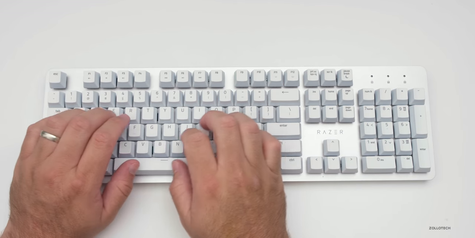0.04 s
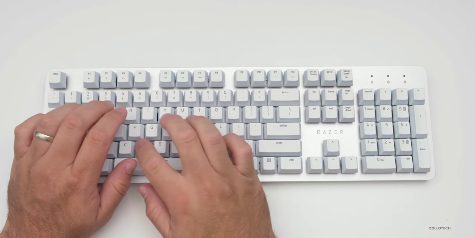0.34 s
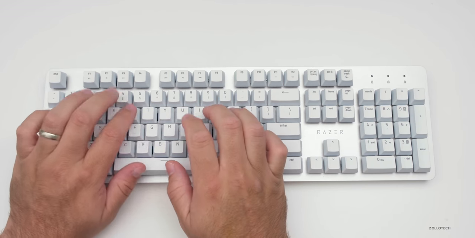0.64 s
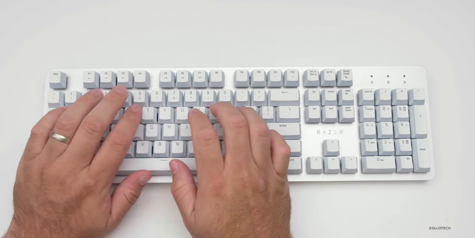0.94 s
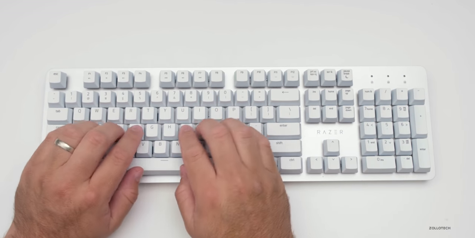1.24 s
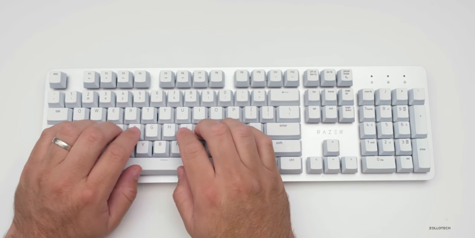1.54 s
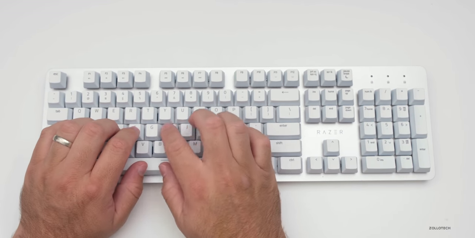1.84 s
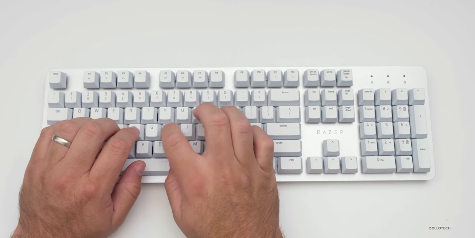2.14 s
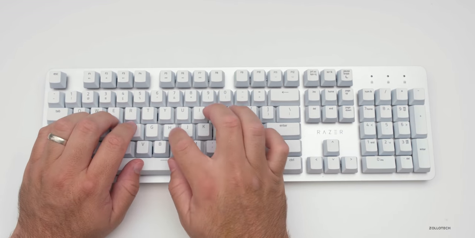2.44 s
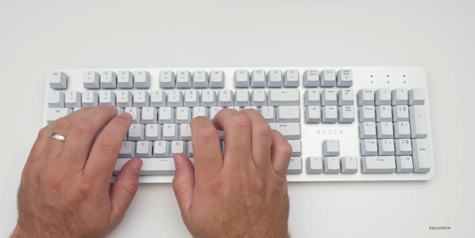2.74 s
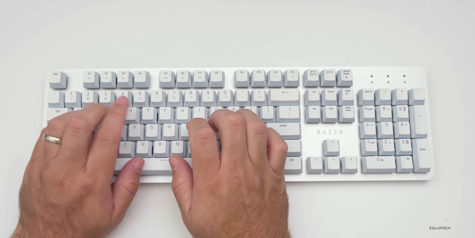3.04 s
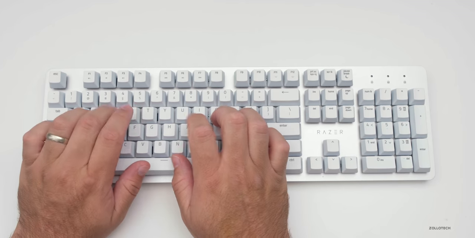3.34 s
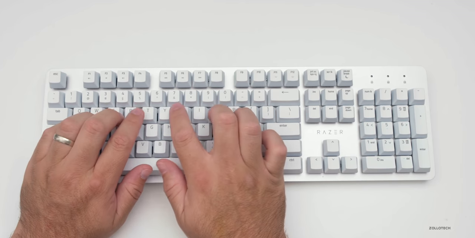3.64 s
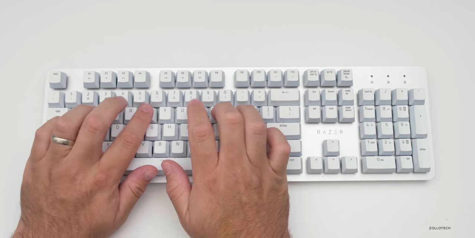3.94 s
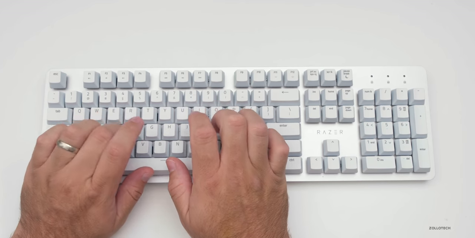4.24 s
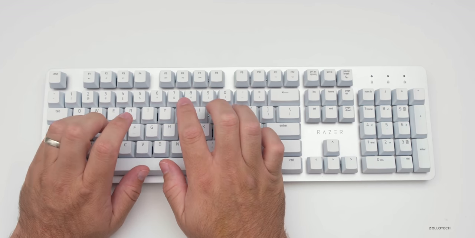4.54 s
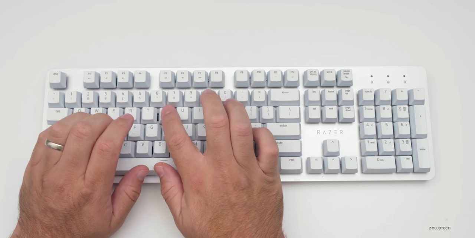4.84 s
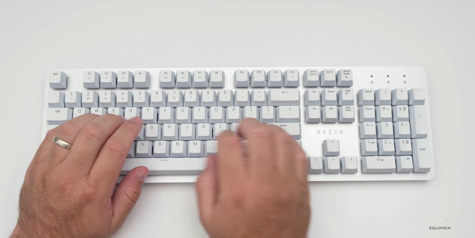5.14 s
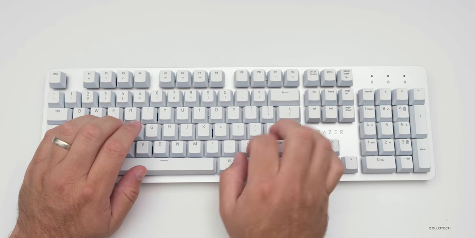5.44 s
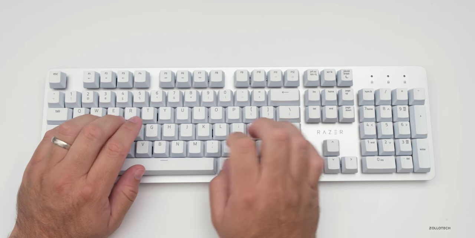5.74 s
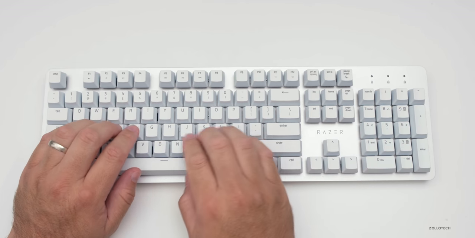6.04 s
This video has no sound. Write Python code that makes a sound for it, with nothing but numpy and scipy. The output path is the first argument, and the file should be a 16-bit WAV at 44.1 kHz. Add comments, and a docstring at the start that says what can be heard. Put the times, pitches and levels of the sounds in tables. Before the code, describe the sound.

In a small room with a low hum and faint hiss, a mechanical keyboard clatters close to the microphone. A few fast keystrokes come first, one of them especially sharp, then a short pause with soft finger touches on the keys. Typing resumes in rapid, irregular clusters of bright plastic clacks, with an occasional soft thud through the desk, and tails off into light taps.

```python
"""Short bursts of typing clatter close to the microphone: two hands on a mechanical keyboard on a desk.
Each key slides, strikes its stop and rattles; the blow rings keycap, plate, case and desk.
Between strokes, fingers brush the caps. A small room answers from the nearby walls,
and behind it all lie a low indoor hum and a faint hiss."""
import sys
import numpy as np
from scipy import signal
from scipy.fft import rfft, irfft
from scipy.io import wavfile

SR = 44100
rng = np.random.default_rng(int(sys.argv[2]) if len(sys.argv) > 2 else 0)


def dump(signal):
    """Clip the signal to [-1, 1] and save it as 16-bit WAV at the path in sys.argv[1]."""
    limited = np.clip(np.atleast_2d(signal).T, -1, 1)
    pcm = np.round(limited * 32767).astype(np.int16)
    wavfile.write(sys.argv[1], SR, pcm)


N = 268128

# room tone, rumble to hiss: f/Hz, relative density/dB
AIR_SPECTRUM = [(20, -1.5), (40, -6.5), (65, 3.5), (110, -3), (150, -11.5), (200, -19), (280, -21),
                (400, -27), (600, -29), (800, -35.5), (1400, -36), (2200, -39), (6000, -41), (16000, -43.5)]
# narrow tones of the indoor hum: f/Hz, width/Hz, level/dB
HUM_TONES = [(118.4, 5.8, -57), (253, 8.2, -77), (744, 14, -85.5), (1268, 8, -86)]
# echoes off nearby walls and furniture: t/s after the direct sound, level/dB relative to it
EARLY_ECHOES = [(.0046, -18), (.0117, -23), (.0134, -26), (.0218, -25.5)]
# colour of the room's tail: f/Hz, relative level/dB
TAIL_SPECTRUM = [(100, -4), (400, 11), (750, -5.5), (1200, -2.5), (2000, 2.5), (3200, -3), (5000, -0.5),
                 (9000, -5), (15000, -11.5)]
# modes of each part: f/Hz, width/Hz, relative level/dB
DESK_MODES = [(179.5, 22, 11), (235, 14, -9.5)]
CASE_MODES = [(348, 76, -3.5), (392, 94, -2), (457.7, 64, 0.5)]
PLATE_MODES = [(705.6, 96, 0), (874, 247, -7.5), (1074, 170, 0.5), (1282, 240, -6.5), (1545, 180, 0.5)]
CAP_MODES = [(1748, 360, 6), (2068, 280, 1.5), (2460, 504, 3.5), (2670, 475, -3.5), (3196, 270, 7.5),
             (3600, 580, 2.5), (4130, 410, 3), (4404, 760, -5)]
HOUSING_MODES = [(4380, 940, -2.5), (5037, 410, -7.5), (5810, 670, -7), (6320, 1000, -12)]
STEM_MODES = [(7345, 520, -6), (8330, 370, -4), (8920, 750, -8), (9590, 160, -10)]
CRACK_MODES = [(11400, 200, -3), (13000, 900, 3.5), (14740, 700, -10.5)]
# a desk thud under one key stroke, and a few soft knocks on the board: t/s, f/Hz, level/dB
LOW_THUDS = [(4.274, 171, -44.5), (4.485, 604, -66.5), (5.16, 221, -51.5), (5.808, 554, -64)]
# fingers shifting about on the caps: start t/s, end t/s, tick level/dB
FIDGET_SPANS = [(1.146, 1.339, -67.5), (1.476, 2.153, -70.5), (2.548, 3.149, -63.5), (3.35, 4.153, -64.5),
                (5.461, 5.591, -58), (5.948, 6.079, -69)]
# clear touches of a fingertip on a cap: t/s, level/dB
CAP_TOUCHES = [(.044, -57), (.153, -60.5), (.248, -53), (.624, -51.5), (.731, -55.5), (.839, -53),
               (.944, -61.5), (1.2, -64), (1.377, -61.5), (1.565, -65.5), (1.649, -62), (1.764, -65),
               (1.826, -55), (2.115, -57), (2.2989, -52.5), (2.684, -55.5), (2.699, -56), (2.947, -56),
               (3.307, -48), (3.723, -54.5), (3.748, -55), (3.878, -56), (3.9672, -53), (4.061, -52.5),
               (4.101, -57), (4.187, -60.5), (4.555, -58), (4.912, -54), (4.997, -55), (5.467, -60),
               (5.541, -56), (5.603, -57), (5.902, -63), (5.986, -55)]
# key strokes and returns: t/s, cap level/dB, cap f/Hz, then plate, case and switch rattle
# level/dB relative to the cap
KEYSTROKES = [(0.2577, -35, 3250, -9, -20.5, -11.5), (0.3272, -41, 3100, -4.5, -20, -2.5),
              (0.3837, -21, 3440, -14, -29.5, -6), (.446, -38.5, 3270, -3, -17, -1),
              (.4493, -38.5, 3270, -2, -13.5, -4.5), (0.5956, -47, 2660, -0.5, -20, -4.5),
              (0.6312, -34.5, 4020, -6, -23, -4), (0.7032, -38.5, 3230, -2.5, -21.5, 0),
              (0.8553, -46.5, 2350, 0.5, -10.5, -3), (1.8555, -62, 3703, 2, 4, 7),
              (1.8673, -34, 3340, -2, -26, -12.5), (2.0364, -39, 3000, -6.5, -18.5, -12.5),
              (2.1249, -44.5, 2600, -8, -20, -7.5), (2.1658, -39.5, 2180, -4, -5.5, -8),
              (2.317, -52, 1950, 1, 1.5, -1), (2.427, -34.5, 2830, -2.5, -21, -10.5),
              (2.5172, -43, 2940, 0.5, -19, -6), (2.6044, -38, 2630, -7.5, -32, -16),
              (2.7195, -41.5, 2520, -2.5, -35, -13), (2.7262, -43, 2830, -2.5, -18, -9),
              (2.805, -44.5, 2430, 6.5, -15, -2), (2.8849, -28, 2600, -8.5, -12, -13.5),
              (2.969, -37, 2810, 4.5, -1.5, 0.5), (2.987, -39, 3080, -1.5, -7, -8),
              (3.1271, -39, 3170, -4, -36, -4), (3.1433, -41.5, 3540, -6, -20, -20),
              (3.2707, -37, 3240, -8.5, -17, -1.5), (3.3161, -35.5, 3170, -7.5, -22, -10.5),
              (3.4095, -41.5, 3050, -5, -19, -3), (3.428, -33.5, 2660, -5.5, -8.5, -14),
              (3.4815, -37, 2910, 2.5, 0, -0.5), (3.49, -52, 3230, 3, 7.5, 3.5),
              (3.5774, -36, 2940, -5, -19, -19), (3.628, -51, 2900, 0, -33, -14),
              (3.6517, -43, 3130, -2, -11, -9.5), (3.7617, -38, 3410, -4.5, -21, -10),
              (3.8119, -32.5, 2500, -6.5, -8, -10.5), (3.8226, -38.5, 2340, -2, -23, -15),
              (3.8497, -44, 3400, 4, -8.5, -1.5), (3.9219, -53.5, 3100, -3, -6, 3.5),
              (3.9328, -41.5, 2130, -2.5, -11, -5.5), (4.0239, -32, 2530, -14, -36, -23),
              (4.034, -49, 2640, 6.5, -4, 0), (4.1301, -42, 2600, -5.5, -32, -10),
              (4.2568, -49.5, 3230, -7.5, -11, -9), (4.273, -38, 3380, -7.5, -27, -11),
              (4.3637, -39.5, 3500, -4, -18, -3.5), (4.5874, -34, 3150, -5, -16, -14),
              (4.7096, -43.5, 2880, -0.5, -20, -5), (4.846, -51, 3700, -9, -13, -7.5),
              (4.9201, -49, 2940, -2.5, -11.5, -22), (5.0142, -38.5, 3240, -7.5, -13.5, -11),
              (5.2553, -46.5, 2840, -10, -22, -4.5), (5.276, -33.5, 2120, -2, -15.5, -10),
              (5.306, -47, 3020, -4, -30, -11), (5.3515, -42.5, 2920, -2, -32, -13),
              (5.4851, -43, 3750, 5, -6.5, 0), (5.4965, -33.5, 3220, -5.5, -18, -5.5),
              (5.6124, -42.5, 3480, 3.5, -8, -6.5)]

RING_SIZE = 4096  # samples in one ring of a part
USUAL_DB, DESK_DB, LANDING_DB = -39.5, -59, -61.5  # ordinary stroke: cap, desk thud, finger landing
DESK_GROWTH, SLIDE_GROWTH, LANDING_GROWTH = .82, .69, .41  # dB gained per dB of cap level
PLATE_HZ, PLATE_SAG_HZ_PER_DB = 1064, 12  # the plate sounds lower when driven harder than the cap


def undb(db):
    """Decibels to gain."""
    return 10 ** (np.asarray(db) / 20)


def unit(x):
    """Scale to an energy of one."""
    return x / np.sqrt(np.sum(x ** 2) + 1e-30)


def add(out, s, x):
    """Mix x into out from time s."""
    i = max(int(round(s * SR)), 0)
    n = max(min(len(x), len(out) - i), 0)
    out[i:i + n] += x[:n]


def coloured(points, size):
    """Noise of rms one, shaped by points of f/Hz, level/dB."""
    hz, db = np.transpose(points)
    f = np.maximum(np.fft.rfftfreq(size, 1 / SR), 1)
    gain = undb(np.interp(np.log(f), np.log(hz), db))
    noise = irfft(rfft(rng.standard_normal(size)) * gain, size)
    return noise / noise.std()


def room_tone(air_db=-53):
    """The place itself: low indoor rumble, faint hiss and a wavering hum."""
    f = np.fft.rfftfreq(N, 1 / SR)
    out = undb(air_db) * coloured(AIR_SPECTRUM, N)
    for hz, width_hz, db in HUM_TONES:
        tone = irfft(rfft(rng.standard_normal(N)) / (1 + ((f - hz) / width_hz) ** 2), N)
        out += undb(db) * tone / tone.std()
    return out


def room(x, quick_t60=.11, quick_db=-20, long_t60=.29, long_db=-22.5, smear_s=.00079):
    """Direct sound reaches the microphone, then echoes and two tails; each spot has its own paths."""
    t = np.arange(4 * RING_SIZE) / SR
    build = np.clip((t - .004) / .0027, 0, 1)
    tails = ((quick_t60, quick_db), (long_t60, long_db))
    decay = sum(undb(db) * unit(build * undb(-60 * t / t60)) for t60, db in tails)
    response = undb(-1.5) * decay * coloured(TAIL_SPECTRUM, len(t))
    response[0] += 1  # direct sound
    smear = np.exp(-t[:RING_SIZE] / smear_s)  # uneven surfaces spread each echo
    for s, db in EARLY_ECHOES:
        add(response, s, undb(db) * unit(rng.standard_normal(RING_SIZE) * smear))
    return signal.fftconvolve(x, response)


def contact(snap, rattle_s, rattle_db, settle_s=.000488, settle_db=-3.5):
    """Force spectrum: a blow (weighted by snap), the stem settling, then the loose cap's chatter."""
    t = np.arange(RING_SIZE) / SR
    snap = np.clip(snap, .05, .97)
    blow = undb(settle_db) * unit(rng.standard_normal(RING_SIZE) * np.exp(-t / settle_s))
    blow[0] = 1
    chatter = rng.standard_normal(RING_SIZE) * (rng.random(RING_SIZE) < .2) * np.exp(-t / rattle_s)
    return rfft(np.sqrt(snap) * unit(blow) + np.sqrt(1 - snap) * undb(rattle_db) * unit(chatter))


def ring(force, modes, db, scatter_db=3, detune=.057, lag=np.pi):
    """A part's modes answer a force, a little differently each time; db is the level over 10 ms."""
    hz, width, mode_db = np.transpose(modes)
    chance = rng.standard_normal((len(hz), 2))
    hz = hz * (1 + detune * chance[:, 0])
    # neighbouring modes swing lag radians apart; the less lag, the more abrupt the attack
    gain = undb(mode_db + scatter_db * chance[:, 1]) * np.exp(1j * lag * np.arange(len(hz)))
    jf = 1j * np.fft.rfftfreq(RING_SIZE, 1 / SR)
    response = sum((g.real * jf + g.imag * h) * w / (h ** 2 + jf ** 2 + jf * w)
                   for h, w, g in zip(hz, width, gain))
    # a part radiates little far below or above its own modes
    low, high = jf / (.75 * hz.min()), jf / (1.15 * hz.max())
    response *= low ** 2 / (low ** 2 + np.sqrt(2) * low + 1)
    response /= (high ** 2 + 1.2 * high + 1) ** 2
    return unit(irfft(force * response)) * undb(db) * np.sqrt(SR / 100)


def favour(modes, pitch_hz, focus_db, octaves):
    """Where a key sits decides which modes it wakes most: those near its own pitch."""
    return [(hz, width, db + focus_db * np.exp(-(np.log2(hz / pitch_hz) / octaves) ** 2))
            for hz, width, db in modes]


def rubbing(start_s=1.6, end_s=1.87, slips_per_s=300, slip_db=-81.5):
    """Barely audible even this close, skin slips over a cap in many tiny steps."""
    out = np.zeros(N)
    for s in rng.uniform(start_s, end_s, int((end_s - start_s) * slips_per_s)):
        force = contact(.12, rattle_s=.0057, rattle_db=-2)
        add(out, s, ring(force, CAP_MODES, slip_db))
    return room(out)[:N]


def touch(db, cap_hz=3100, plate_hz=1230):
    """A light touch makes a cap chatter against its stem."""
    force = contact(.19, rattle_s=.0043, rattle_db=-2.5)
    cap = ring(force, favour(CAP_MODES, cap_hz, focus_db=1.5, octaves=.35), db + .5, scatter_db=1.5)
    plate = ring(force, favour(PLATE_MODES, plate_hz, focus_db=9, octaves=.24), db, scatter_db=2)
    return cap + plate + ring(force, HOUSING_MODES, db - 12) + ring(force, STEM_MODES, db - 17)


def fingers(fidgets_per_s=40, spread_db=2):
    """Fingertips land ahead of the strokes, touch idle caps and fidget; desk and board thud softly."""
    out = np.zeros(N)
    landings = [(s - rng.uniform(.007, .02), LANDING_DB + LANDING_GROWTH * (db - USUAL_DB))
                for s, db, *_ in KEYSTROKES]
    fidgets = [(s, db + spread_db * rng.standard_normal())
               for start, end, db in FIDGET_SPANS
               for s in rng.uniform(start, end, int((end - start) * fidgets_per_s))]
    for s, db in list(CAP_TOUCHES) + landings + fidgets:
        add(out, s, touch(db))
    for s, hz, db in LOW_THUDS:
        force = contact(.25, rattle_s=.0074, rattle_db=2.5)
        add(out, s, ring(force, [(hz, 35, 0)], db))
    return room(out)[:N]


def slide(db, lead_s, swell_s=.0057):
    """The stem scrapes down its housing, louder and louder until it strikes at lead_s."""
    ahead_s = (int(lead_s * SR) - np.arange(RING_SIZE)) / SR
    slips = rng.standard_normal(RING_SIZE) * (rng.random(RING_SIZE) < .3)
    force = rfft(slips * (ahead_s > 0) * np.exp(-(ahead_s / swell_s) ** 2 / 2))
    scrape = ring(force, CAP_MODES[2:] + HOUSING_MODES, db)
    return scrape + ring(force, STEM_MODES, db - 14) + ring(force, PLATE_MODES, db - 2.5)


def typing(lead_s=.04, case_lag_s=.00051, desk_lag_s=.00033):
    """Close to the microphone, each blow rings every part; the heavy case and desk answer later."""
    out = np.zeros(N)
    for s, db, cap_hz, plate_db, case_db, rattle_db in KEYSTROKES:
        harder_db = db - USUAL_DB
        stem_db = rattle_db - 5.5
        snap = .41 + .014 * harder_db - .01 * rattle_db  # cleaner with more force and less rattle
        force = contact(snap, rattle_s=.004, rattle_db=-2)
        cap_modes = favour(CAP_MODES, cap_hz, focus_db=9, octaves=.34)
        plate_hz = PLATE_HZ - PLATE_SAG_HZ_PER_DB * plate_db
        plate_modes = favour(PLATE_MODES, plate_hz, focus_db=5, octaves=.25)

        key = slide(USUAL_DB - 19.5 + SLIDE_GROWTH * harder_db, lead_s)
        cap = ring(force, cap_modes, db + .11, scatter_db=4.04, detune=.031, lag=1.136)
        plate = ring(force, plate_modes, db + plate_db + .47, scatter_db=4.5, detune=.02, lag=2.83)
        housing = ring(force, HOUSING_MODES, db + rattle_db - .8, scatter_db=3.5, detune=.055)
        stem = ring(force, STEM_MODES, db + stem_db, scatter_db=5, detune=.02)
        # a key that bottoms out hard on the case also gives a very high crack
        crack_force = contact(.47, rattle_s=.0023, rattle_db=2)
        crack = ring(crack_force, CRACK_MODES, db + (case_db + stem_db) / 2 - 14.5)
        case = ring(force, CASE_MODES, db + case_db - 1, scatter_db=1.5, detune=.014)
        desk = ring(force, DESK_MODES, DESK_DB + DESK_GROWTH * harder_db, scatter_db=6.5, detune=.06)

        add(key, lead_s, cap + plate + housing + stem + crack)
        add(key, lead_s + case_lag_s, case)
        add(key, lead_s + desk_lag_s, desk)
        add(out, s - lead_s, room(key))
    return out


def scene():
    """One microphone close to the keyboard, in a small room."""
    return (typing() + fingers() + rubbing() + room_tone())[None]


def record(dry, top_hz=16000):
    """The recorder cuts the top steeply."""
    return signal.sosfilt(signal.ellip(10, .1, 80, top_hz, fs=SR, output="sos"), dry)


dry = scene()
out = record(dry)
dump(out)
```